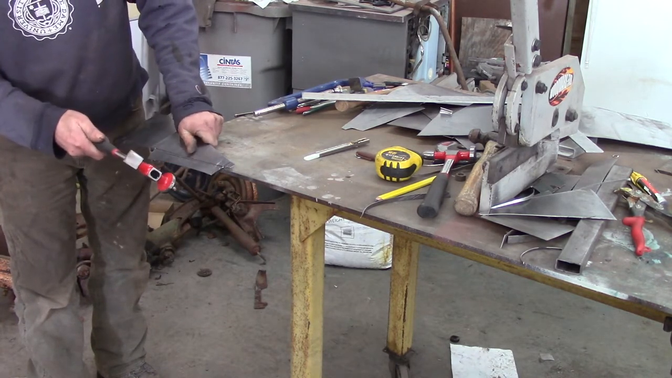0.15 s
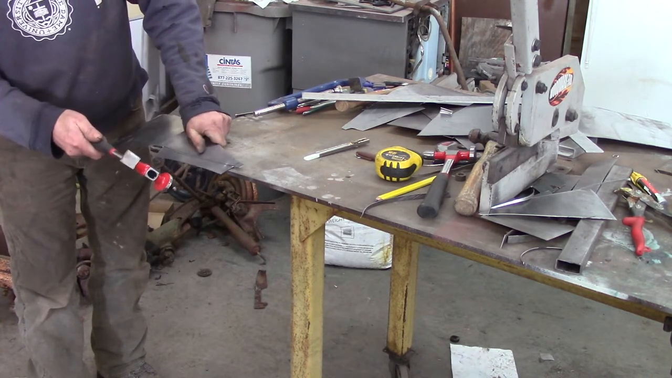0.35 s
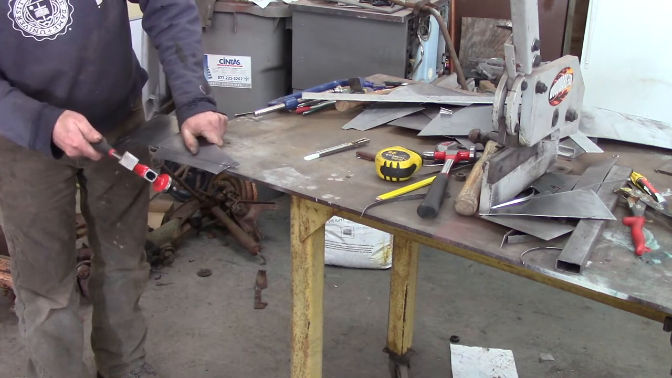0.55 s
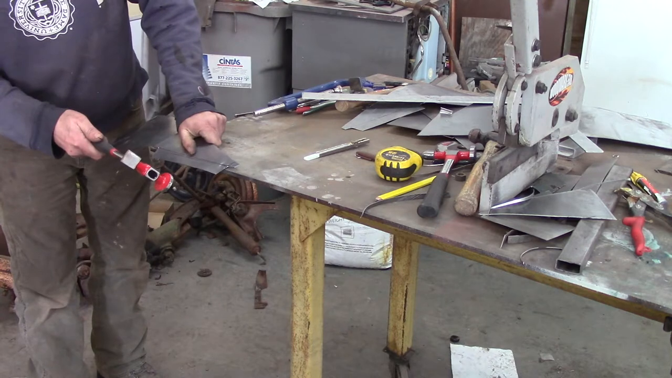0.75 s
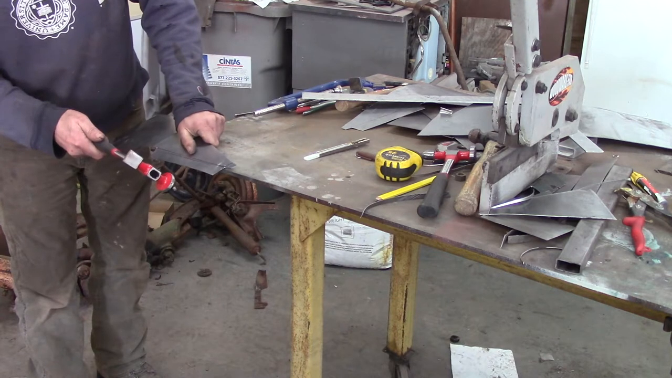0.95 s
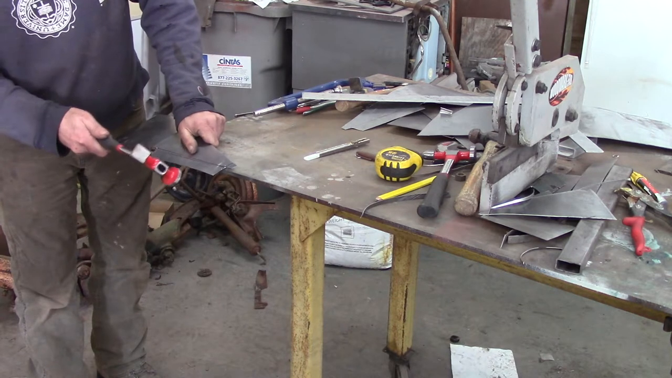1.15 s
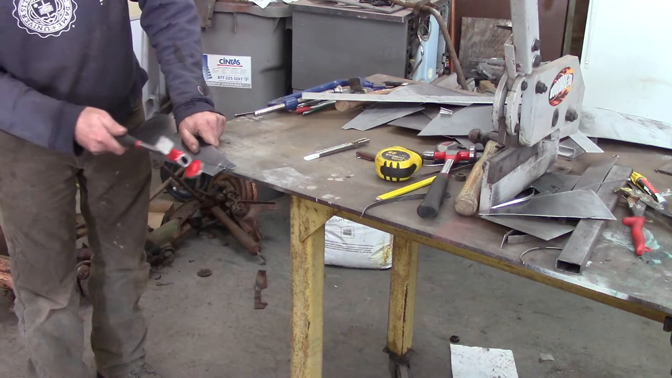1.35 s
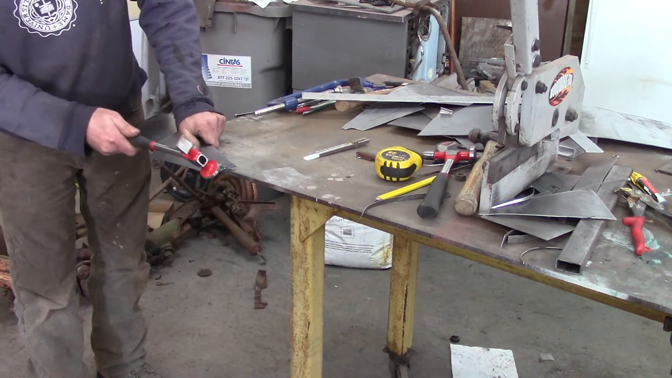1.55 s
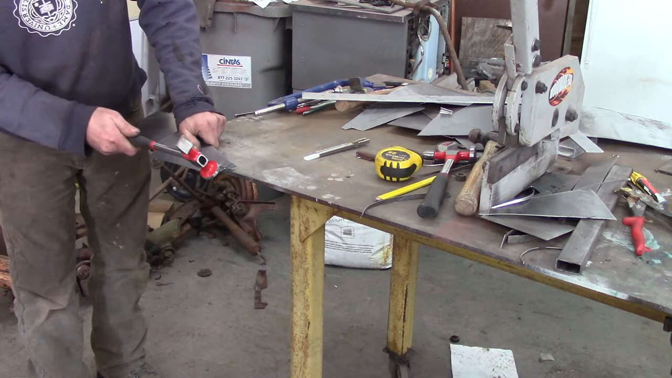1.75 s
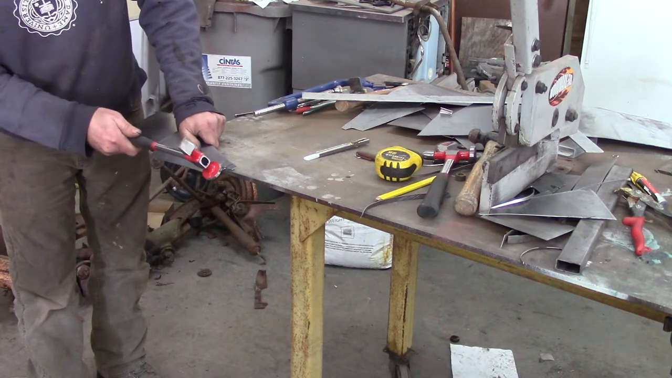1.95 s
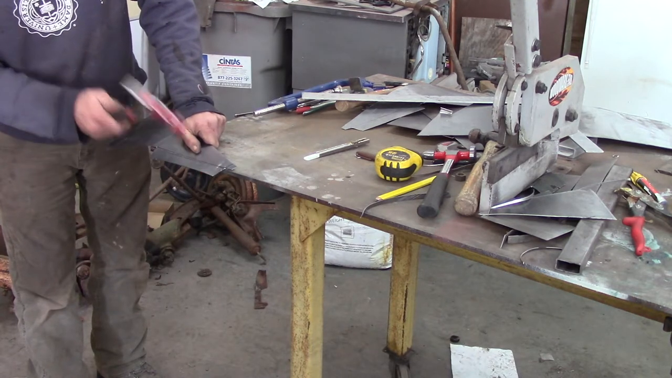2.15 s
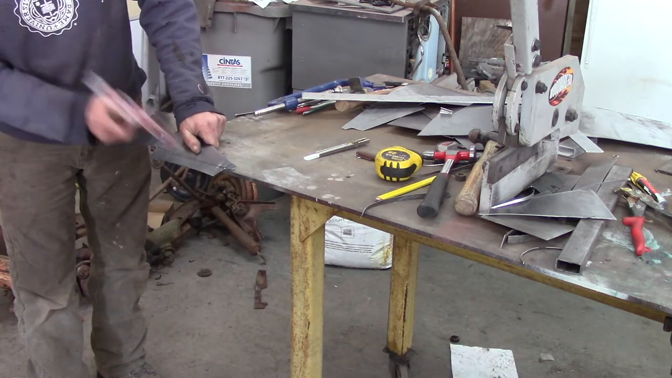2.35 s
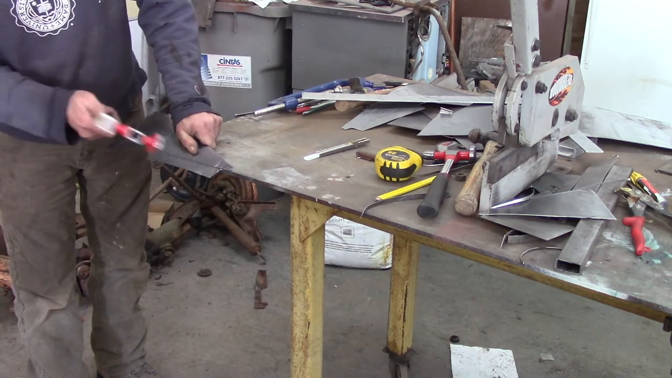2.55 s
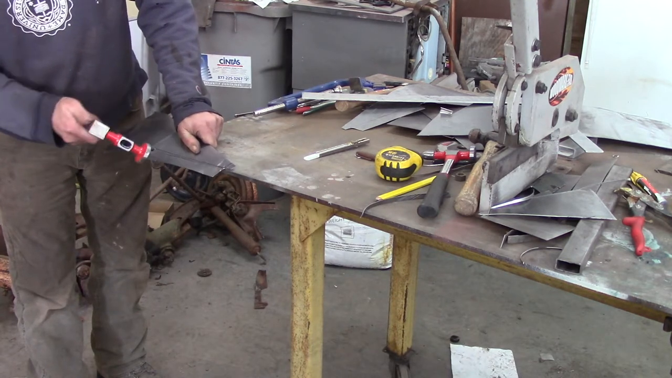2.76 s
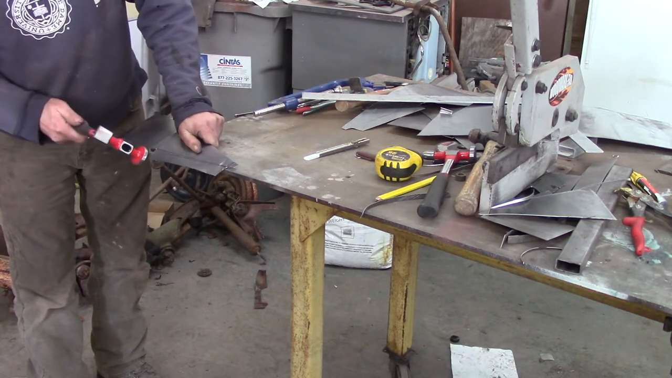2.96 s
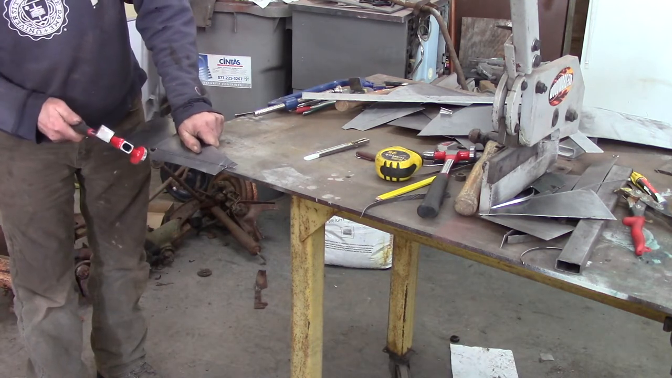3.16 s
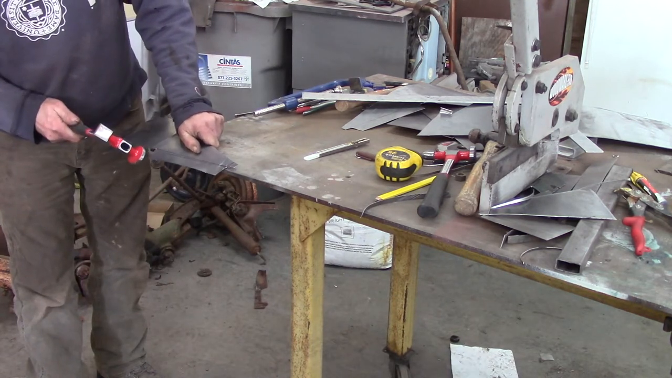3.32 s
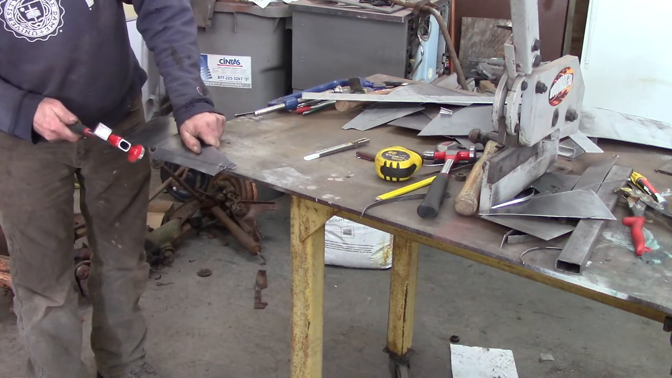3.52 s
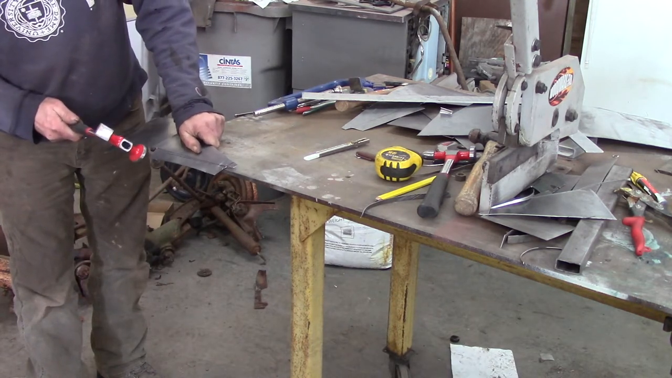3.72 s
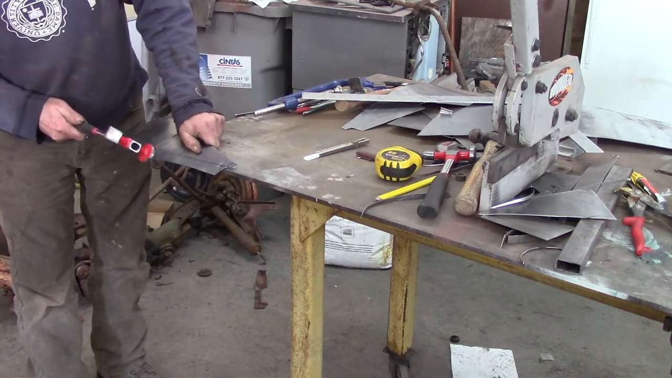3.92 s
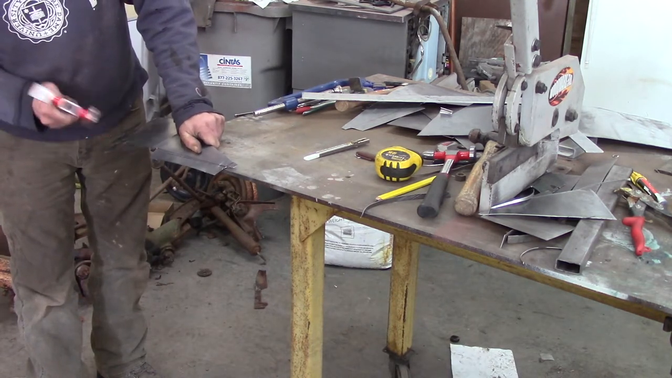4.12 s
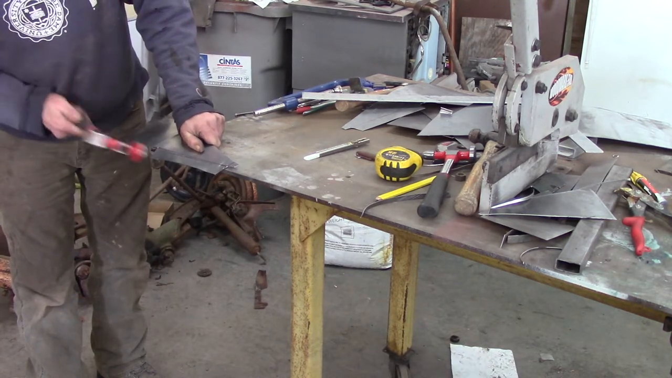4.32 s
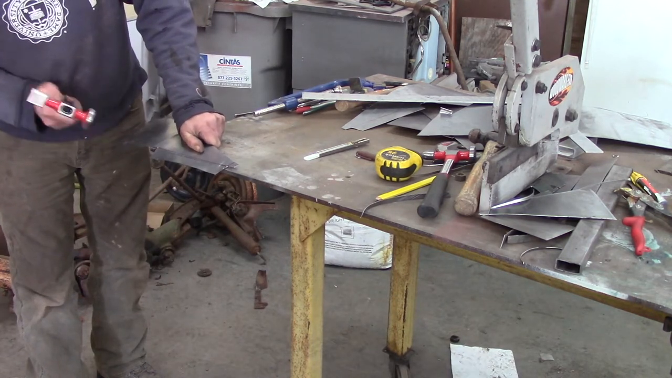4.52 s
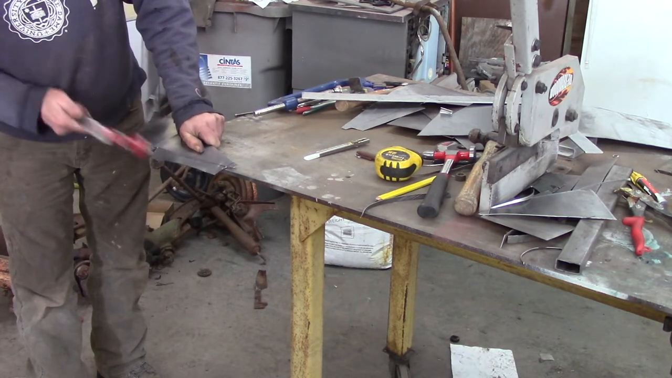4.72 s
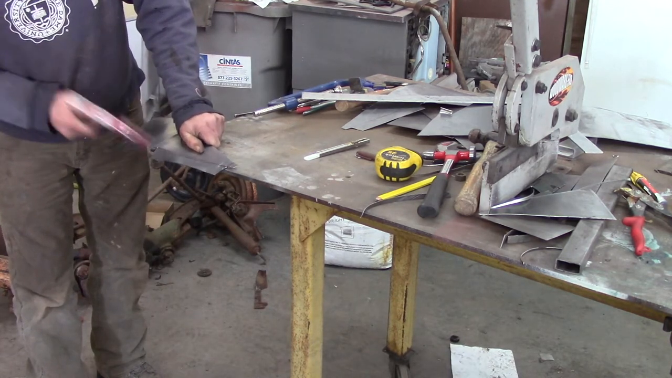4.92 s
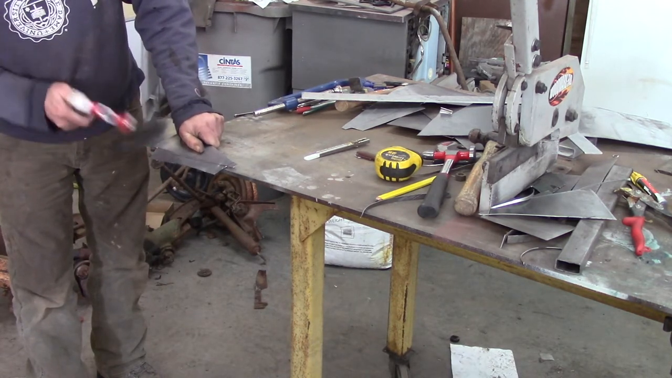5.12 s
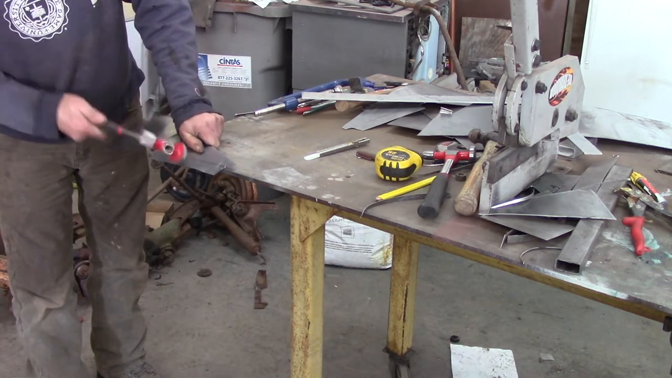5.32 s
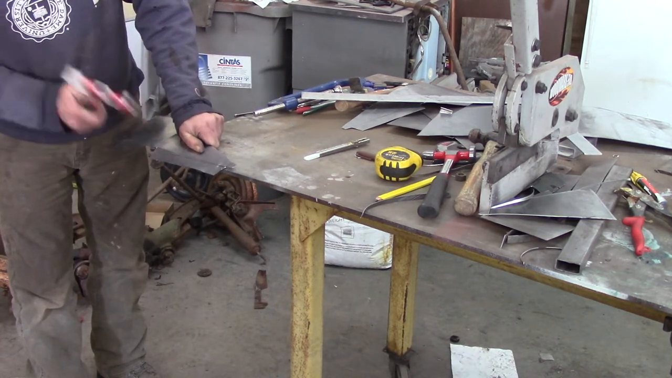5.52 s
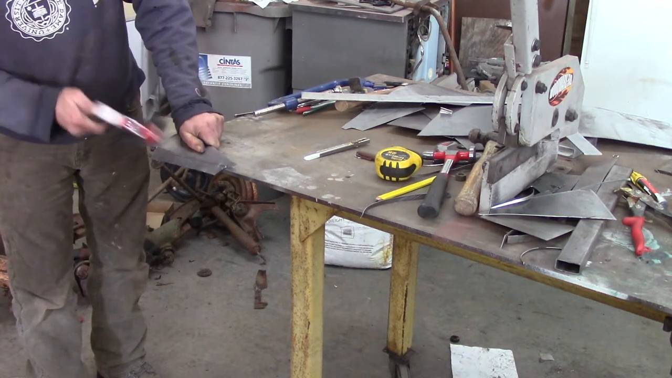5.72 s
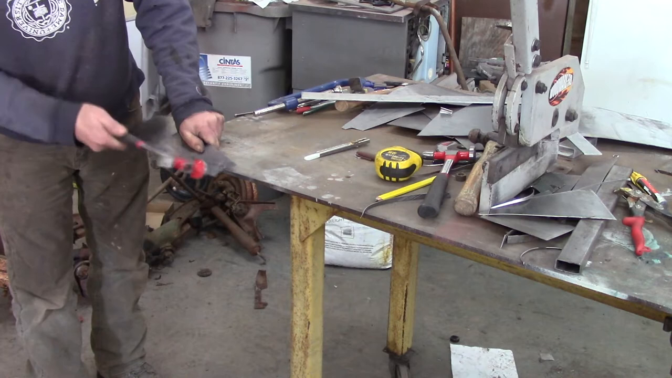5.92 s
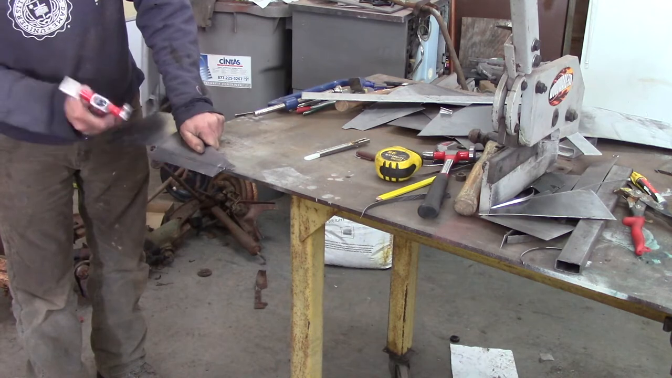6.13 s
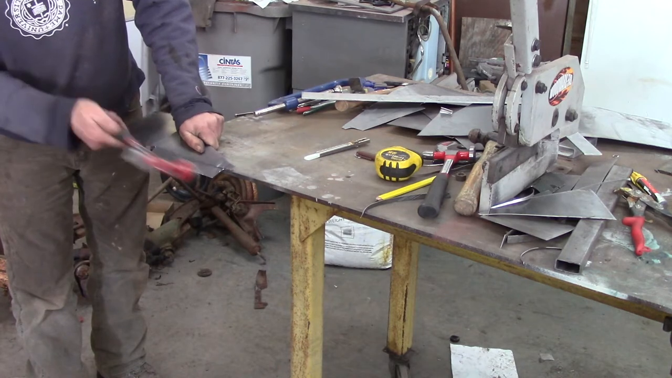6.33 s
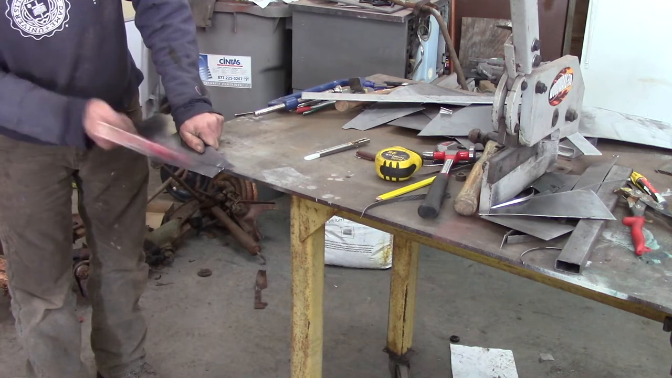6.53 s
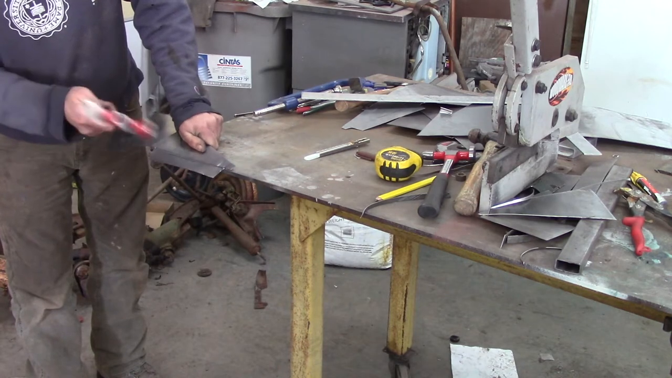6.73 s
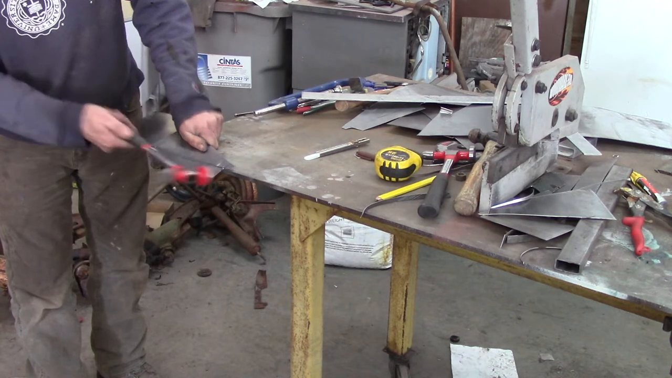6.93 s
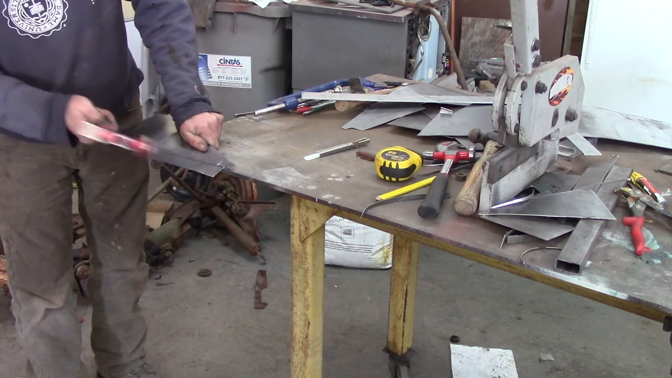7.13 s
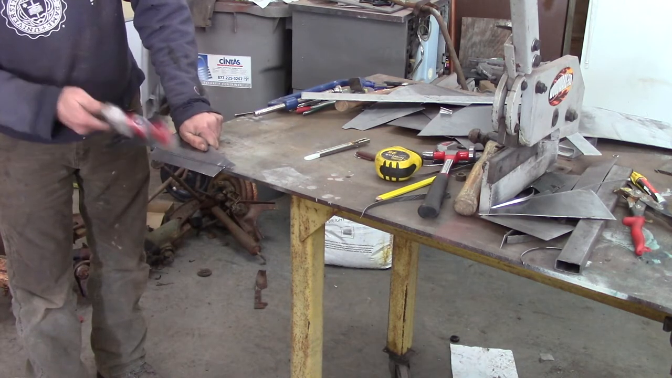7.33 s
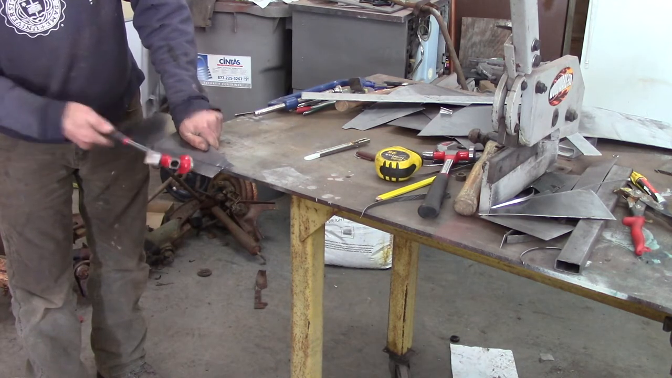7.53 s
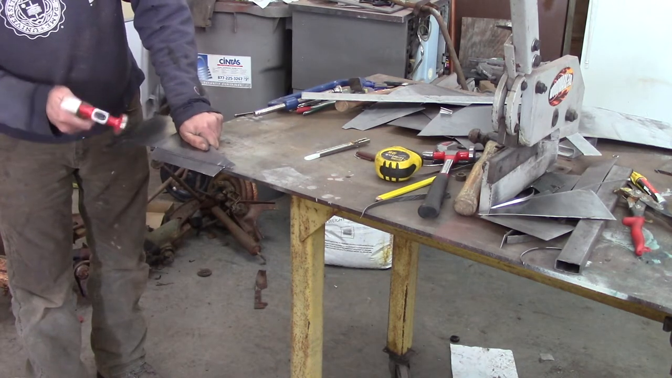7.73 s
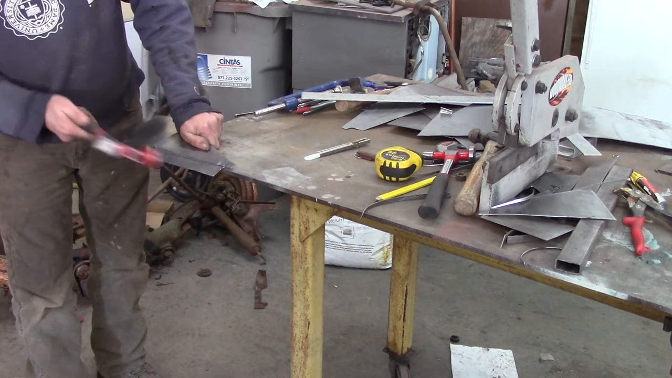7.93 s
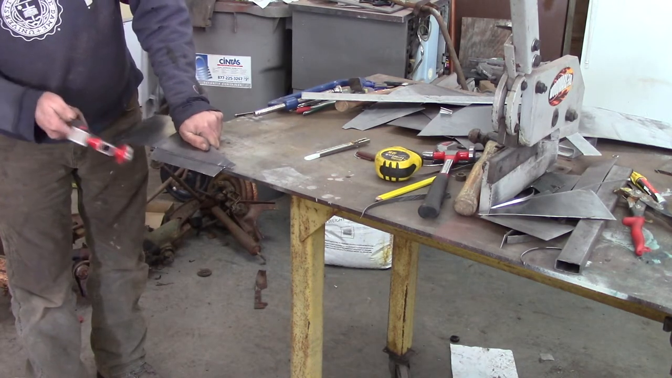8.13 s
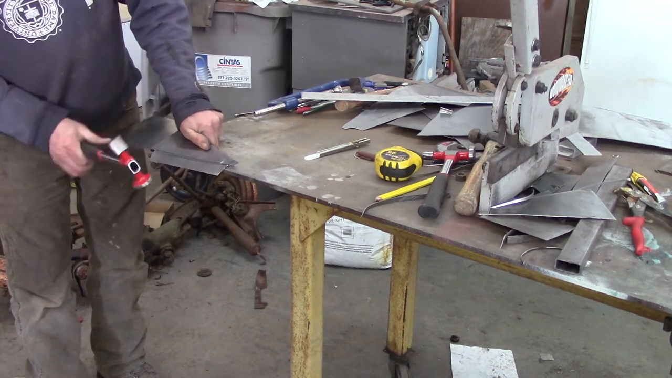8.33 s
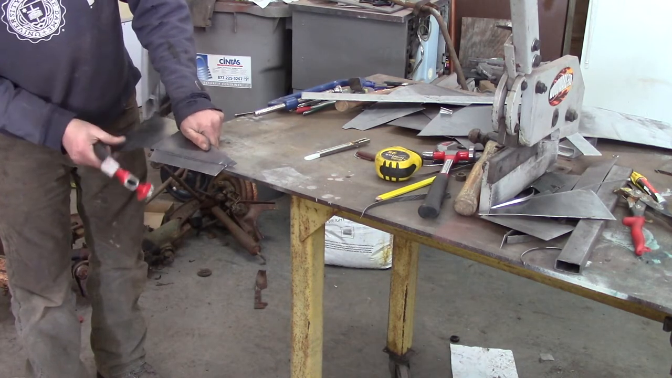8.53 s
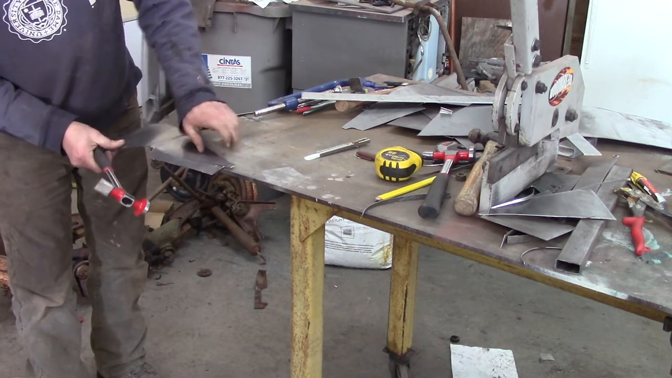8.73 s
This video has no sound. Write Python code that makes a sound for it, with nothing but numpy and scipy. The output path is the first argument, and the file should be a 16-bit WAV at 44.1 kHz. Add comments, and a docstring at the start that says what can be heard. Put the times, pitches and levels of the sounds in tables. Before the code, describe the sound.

In a quiet, slightly echoing workshop, sheet metal is shuffled on a bench and given a few light aiming taps. One loud hammer strike cracks and rings out nearby, followed by a couple of soft bumps. Then twelve evenly paced strikes clang on the sheet, each slightly different in tone, making the steel bench and its tools ring. It ends with a faint rattle, two small clinks and a brief scrape.

```python
"""Hammering sheet steel on a workbench

A steel sheet is shuffled into place on a steel bench, tapped lightly, then hammered over the edge:
one blow, a pause, and a run of twelve. Each blow cracks and sets the bench, its loose tools and the
workshop ringing. A limiter holds each crash level for a moment before it is heard to die away.
At the end loose steel rattles to rest and the sheet is lifted. A low hush lies under it all."""
import sys
import numpy as np
from scipy import signal
from scipy.fft import rfft, irfft, next_fast_len
from scipy.io import wavfile

SR = 44100
rng = np.random.default_rng(int(sys.argv[2]) if len(sys.argv) > 2 else 0)


def waveform_to_disk(signal):
    """Save audio, clipped to [-1, 1], as 16-bit WAV at the path in sys.argv[1]."""
    frames = np.transpose(np.atleast_2d(signal))
    scaled = np.clip(frames, -1, 1) * 32767
    samples = np.round(scaled).astype(np.int16)
    wavfile.write(sys.argv[1], SR, samples)


N = 386757

# the sheet sliding on the bench: t/s, length/s, level/dB, brightness/dB
SHEET_SLIDES = [(.001, 0.03, -32, -24), (0.154, .04, -29.5, -7.5), (0.191, 0.028, -23.5, -10),
                (0.482, 0.073, -37.5, -14), (0.756, 0.043, -37, -15.5), (8.532, .052, -34, -8.5),
                (8.6, 0.21, -48.5, -3.5)]
# the sheet bumping the bench, dull when flat and bright on its edge: t/s, level/dB, brightness/dB
SHEET_BUMPS = [(.247, -38, 19), (.54, -39.5, -5), (.759, -40, -11), (.917, -46.5, -6), (2.941, -31, -13),
               (3.448, -38.5, -14), (3.515, -36.5, -11), (8.42, -37, -10), (8.487, -31.5, -3),
               (8.733, -41, -1)]
# the hammer's light aiming taps and its rebound: t/s, level/dB
AIMING_TAPS = [(1.459, -18), (1.847, -25), (1.912, -38)]
# full blows: t/s, level/dB, f/Hz that the struck spot favours, boost/dB there
HAMMER_BLOWS = [(2.3445, 3, 3100, 3), (4.2011, 3, 4460, 2), (4.573, 4, 2560, 4), (4.9065, 3.5, 396, 4.5),
                (5.2164, 5, 485, 2.5), (5.5388, 5, 2100, 2.5), (5.8638, 3, 2890, 8), (6.1905, 3, 4950, 6),
                (6.512, 3.5, 6440, 2.5), (6.831, 2.5, 930, 5.5), (7.1344, 5.5, 1820, 2.5),
                (7.445, 4, 2450, 4), (7.7637, 4, 600, 3)]

# modes, the tones an object rings with: f/Hz, level/dB, t60/s (the time to fade by 60 dB)
SHEET_MODES = [(590, -13.5, 0.67), (1140, -10, .35), (1252, 1.5, 0.5), (1330, 2.5, 0.55),
               (1420, -9.5, 0.81), (2214, -6, .42), (2400, -5.5, 0.4), (2830, -8.5, 0.16),
               (3595, -5, 0.527), (3830, -14, 0.38), (3950, -15, 0.73), (4670, -15, 0.37), (5620, -20, 0.3),
               (6100, -20, .3), (6190, -7, .3), (6550, -15, 0.23), (6800, -32.5, .25), (7600, -12.5, .25)]  # the small sheet ringing freely
BENCH_MODES = [(84, -30, .7), (136, -18, .8), (198, -22, .75), (237, -17, .85), (339, -19, .85),
               (505, -14, .8), (570, -12, .8), (598, -10, .75), (619, -6.3, .8), (755, -12, .75),
               (787, -10, .75), (984.5, -2.2, .8), (1221, -10, .85), (1287, -6, .9), (1355, -10, .9),
               (1618, -12, .85), (1754, -12, .85), (2212, -15, .8), (2428, -18, .8), (2728, -15, .8),
               (3371, -18, .8), (3834, -22, .75)]  # the bench top with the sheet pressed on it
LIFTED_MODES = [(780, 1, 0.54), (1280, -7, .45), (1570, -1, 0.36), (1726, -6, 0.51), (2120, -13, .35)]  # the sheet let go and lifted from the edge

# spectra, how strong a noise is from bass to treble: f/Hz, level/dB
HUSH_SPECTRUM = [(20, -37), (45, -24.5), (80, -16), (130, -8), (200, -0.5), (270, 1), (600, -3), (900, -10),
                 (1300, -16.5), (1700, -15), (2200, -23.5), (5000, -30), (11000, -37), (16000, -52.5)]  # the quiet workshop
KNOCK_SPECTRUM = [(60, -26.5), (250, 0.5), (420, -8), (650, 1), (1000, 0.5), (1450, -2), (1800, -13.5),
                  (3000, -20), (6000, -30.5), (16000, -53)]  # the bench touched lightly
TICK_SPECTRUM = [(300, -37.5), (1500, 1), (2900, 4), (4800, -3), (6400, 0.5), (10000, -1.5), (13000, -11.5),
                 (16000, -28.5)]  # steel touching steel
CRASH_SPECTRUM = [(25, -45), (65, -37.5), (130, -14.5), (240, -10), (480, -8.5), (620, -4), (860, -2.5),
                  (1060, -4.5), (1320, -2), (2000, -8.5), (2900, -11), (4500, -15), (7000, -15.5),
                  (9800, -15.5), (12000, -25), (16000, -35)]  # bench, tools and room after a blow
CRACK_SPECTRUM = [(200, -30), (1200, -5.5), (2900, 7.5), (5000, 2), (9500, 6.5), (12000, 0.5), (16000, -18)]  # the hammer landing

# how long each frequency takes to fade: f/Hz, t60/s
ROOM_DECAY = [(200, 0.42), (1200, 0.94), (4000, 0.63), (9000, 0.25), (15000, 0.23)]  # the room's echo
CRASH_DECAY = [(100, 0.63), (400, 0.83), (1200, 0.91), (3000, 0.91), (5500, 0.64), (9000, 0.42),
               (15000, 0.39)]  # the crash of a blow

AGE = np.arange(int(1.3 * SR)) / SR  # seconds since a hit began


def amp(db):
    """Turns decibels into a gain to multiply by."""
    return 10 ** (np.asarray(db) / 20)


def unit_rms(x):
    """Scales x to an average power of 1."""
    return x / np.sqrt(np.mean(x ** 2) + 1e-20)


def curve_at(points, hz):
    """Joins points with straight lines on a log-frequency axis and gives the value at hz."""
    f, value = np.transpose(points)
    return np.interp(np.log(hz + 1), np.log(f + 1), value)


def add(mix, start_s, sound):
    """Mixes a sound in at its start time."""
    part = mix[max(round(start_s * SR), 0):][:len(sound)]
    part += sound[:len(part)]


def colour(x, spectrum):
    """Turns each frequency of x up or down by a spectrum in dB."""
    size = next_fast_len(len(x) + 4096)
    gain = amp(curve_at(spectrum, np.fft.rfftfreq(size, 1 / SR)))
    return irfft(rfft(x, size) * gain, size)[:len(x)]


def noise(spectrum, size=len(AGE)):
    """Noise of power 1 with the given spectrum."""
    return unit_rms(colour(rng.standard_normal(size), spectrum))


def die_away(x, decay):
    """Lets every frequency of x fade at its own speed."""
    hz, t, bands = signal.stft(x, SR, nperseg=256)
    fade = amp(-60 * t / curve_at(decay, hz)[:, None])
    return signal.istft(bands * fade, SR, nperseg=256)[1][:len(x)]


def rise(seconds):
    """A fade-in: vibration takes a moment to spread through the steel and the room."""
    return 1 - np.exp(-AGE / seconds)


def lumpy(x, depth_db, width_hz):
    """The struck spot favours some of the sheet's broad resonances and weakens others."""
    hz = np.fft.rfftfreq(len(x), 1 / SR)
    lumps_db = depth_db * np.clip(rng.standard_normal(2048), -2, 2)
    gain_db = np.interp(hz / width_hz, np.arange(len(lumps_db)), lumps_db)
    gain_db *= np.minimum(hz / 1500, 1)  # smoother in the bass
    return unit_rms(irfft(rfft(x) * amp(gain_db), len(x)))


def modes(table, scatter_db, detune, split_hz=5, twin_gain=0.8):
    """Fading tones, each beating with a close twin; the spot struck sets levels, the grip pitch."""
    hz, db, t60 = np.transpose(table)[:, :, None]
    share, shift, phase, split, twin_phase = rng.standard_normal((5, len(table), 1))
    turns = hz * (1 + detune * shift) * AGE + phase
    twin_turns = turns + split_hz * split * AGE + twin_phase
    pairs = np.sin(2 * np.pi * turns) + twin_gain * np.sin(2 * np.pi * twin_turns)
    tones = amp(db + scatter_db * share - 60 * AGE / t60) * pairs
    return tones.sum(0) / np.sqrt(np.sum(amp(db) ** 2) * (1 + twin_gain ** 2) / 2)


def hush():
    """The workshop's low, steady background noise."""
    return amp(-42.5) * noise(HUSH_SPECTRUM, size=N)


def touch(spectrum, body_s, room_db, lump_hz):
    """A light contact: a short burst of resonances, then the room's echo."""
    direct, echo = (lumpy(noise(spectrum), depth_db=3.5, width_hz=lump_hz) for _ in range(2))
    return direct * np.exp(-AGE / body_s) + amp(room_db) * die_away(echo, ROOM_DECAY) * rise(0.003)


def knock():
    """The dull answer of the bench to a light touch."""
    return touch(KNOCK_SPECTRUM, body_s=0.029, room_db=-3.5, lump_hz=70.8) * rise(0.00043)


def tick():
    """The bright click of steel on steel."""
    return touch(TICK_SPECTRUM, body_s=0.013, room_db=-7.5, lump_hz=134.5)


def slides(slips_per_s=900, spread_db=4):
    """Sliding steel catches and slips in a stream of tiny uneven knocks and ticks."""
    out = np.zeros(N)
    for start_s, length_s, rub_db, bright_db in SHEET_SLIDES:
        size = int(length_s * SR)
        slipping = rng.random(len(AGE))[:size] < slips_per_s / SR
        strength = np.minimum(rng.exponential(1, len(AGE))[:size], 3)
        slips = slipping * amp(spread_db * strength) * signal.windows.tukey(size, .5)
        for db, answer in ((rub_db, knock()), (rub_db + bright_db, tick())):
            scrape = signal.fftconvolve(slips, answer)  # every slip sets off the same answer
            add(out, start_s, amp(db) * scrape / np.sqrt(np.sum(scrape ** 2) / size + 1e-20))
    return out


def sheet_ring(damping_s=0.022):
    """The small sheet rings; the holding hand quickly damps the first part."""
    grip = .5 + np.exp(-AGE / damping_s)
    return modes(SHEET_MODES, scatter_db=-1.5, detune=0.0012) * grip * rise(0.00057)


def bumps(ring_db=-15):
    """The sheet is shifted and knocks against the bench; being held, it hardly rings."""
    out = np.zeros(N)
    for start_s, db, bright_db in SHEET_BUMPS:
        add(out, start_s, amp(db) * (knock() + amp(bright_db) * tick() + amp(ring_db) * sheet_ring()))
    return out


def taps(firm_db=-18):
    """The hammer finds its aim: a firm tap makes the sheet ring, a soft one is mostly click and knock."""
    out = np.zeros(N)
    for start_s, db in AIMING_TAPS:
        softer_db = np.clip(firm_db - db, 0, 10)
        knock_db = -8.5 + 0.55 * softer_db
        ring_db = 1 - 0.75 * softer_db
        add(out, start_s, amp(db) * (tick() + amp(knock_db) * knock() + amp(ring_db) * sheet_ring()))
    return out


def crash(shared_noise, alike=0.43):
    """The crowded modes of bench and room blur into noise; part of it repeats from blow to blow."""
    crowd = alike * shared_noise + np.sqrt(1 - alike ** 2) * noise(CRASH_SPECTRUM)
    crowd = lumpy(crowd, depth_db=2.3, width_hz=60)
    return amp(1) * die_away(crowd, CRASH_DECAY) * rise(0.0059)


def bench_ring():
    """The struck bench top rings with its own clear tones."""
    return amp(-4) * modes(BENCH_MODES, scatter_db=2.0, detune=0.0012) * rise(0.0045)


def late_bass(x, bass_hz=463, rise_s=0.01):
    """The heavy bench gets moving later than the sheet, so the bass swells in after the treble."""
    bass = colour(x, [(bass_hz, 0), (2 * bass_hz, -20)])
    return x - bass * (1 - rise(rise_s))


def crack(treble_db, crack_s=0.0035, sizzle_s=0.026, slap_s=0.013):
    """The hammer lands; the sheet sizzles briefly, then springs back and slaps the bench edge."""
    contact = amp(0.5) * np.exp(-AGE / crack_s) * rise(0.00045)
    sizzle = amp(-8 + treble_db) * np.exp(-AGE / sizzle_s)
    since_slap = AGE - 0.034 * rng.uniform(0.57, 1.8)
    slap = amp(-12) * (since_slap > 0) * np.exp(-abs(since_slap) / slap_s)
    return (contact + sizzle + slap) * lumpy(noise(CRACK_SPECTRUM), depth_db=3, width_hz=160)


def hammer(usual_db=4, dulling=0.8, peak_octaves=0.32):
    """Each full blow is a sharp crack on top of the ringing of bench and room."""
    out, shared_noise = np.zeros(N), noise(CRASH_SPECTRUM)
    for start_s, db, favoured_hz, boost_db in HAMMER_BLOWS:
        treble_db = -0.02 - dulling * (db - usual_db)  # louder blows get less treble and sizzle
        body = late_bass(crash(shared_noise) + bench_ring())
        body = colour(body, [(650, -0.66), (950, 0), (1800, 0), (3000, 1.15), (8000, treble_db)])
        # the hammer walks along the edge, and each spot brings out one broad resonance
        peak = [(favoured_hz * 2 ** (k * peak_octaves), boost_db * (k == 0)) for k in (-1, 0, 1)]
        add(out, start_s, amp(db) * (colour(body, peak) + crack(treble_db)))
    return out


def settle(start_s=8.12, gap_s=.083, shrink=.68, first_db=-42, loss_db=2.0):
    """After the last blow loose steel rattles to rest, each bounce sooner and weaker."""
    out = np.zeros(N)
    for bounce in range(3):
        add(out, start_s, amp(first_db - loss_db * bounce) * (knock() + tick()))
        start_s += gap_s * shrink ** bounce
    return out


def lift():
    """Freed from the hand's pressure, the sheet clinks twice with a lower ring."""
    out = np.zeros(N)
    for start_s, db in ((8.487, -34.5), (8.553, -37)):
        add(out, start_s, amp(db) * modes(LIFTED_MODES, scatter_db=3.5, detune=.002) * rise(.002))
    return out


def scene(mid_db=-5, side_db=-34):
    """All the sounds together; reflections from the walls make left and right differ slightly."""
    mix = hammer() + taps() + bumps() + settle() + slides() + lift() + hush()
    walls = irfft(np.exp(2j * np.pi * rng.random(129)))  # random phases scatter the sound in time
    mid = amp(mid_db) * mix
    side = amp(side_db) * signal.oaconvolve(mix, walls)[:N]
    return np.array([mid + side, mid - side])


def record(dry, limit_db=-10.0, attack_s=0.0035, recover_db_per_s=90, cutoff_hz=16100):
    """A limiter turns loud moments down, then a filter cuts the highest treble."""
    memory = np.exp(-1 / (attack_s * SR))
    power = signal.lfilter([1 - memory], [1, -memory], (dry ** 2).mean(0))
    power_db = 10 * np.log10(power + 1e-12)
    fall_db = np.arange(N) / SR * recover_db_per_s
    peak_db = np.maximum.accumulate(power_db + fall_db) - fall_db  # jumps up, then sinks steadily
    over_db = np.maximum(peak_db - limit_db, 0)
    held = np.clip(dry / amp(over_db), -.91, .91)  # a blow's first milliseconds slip past and clip
    lowpass = signal.firwin(255, cutoff_hz, window=("kaiser", 8), fs=SR)
    return signal.oaconvolve(held, lowpass[None], "same")


dry = scene()
out = record(dry)
waveform_to_disk(out)
```